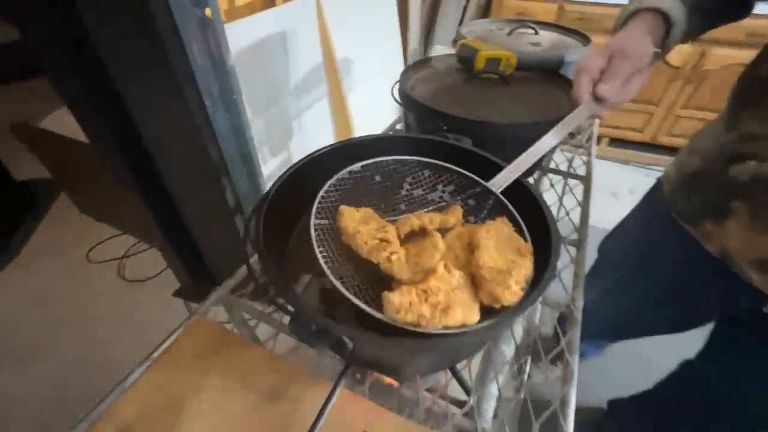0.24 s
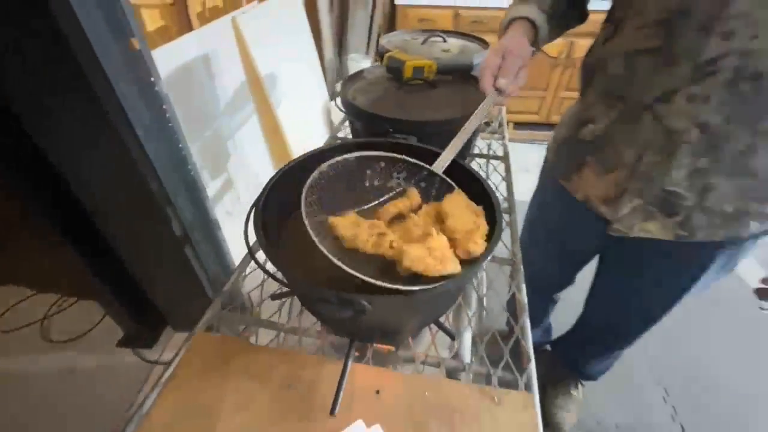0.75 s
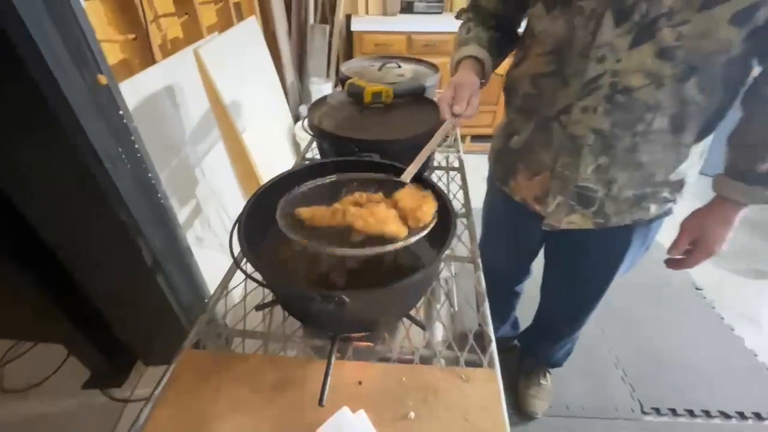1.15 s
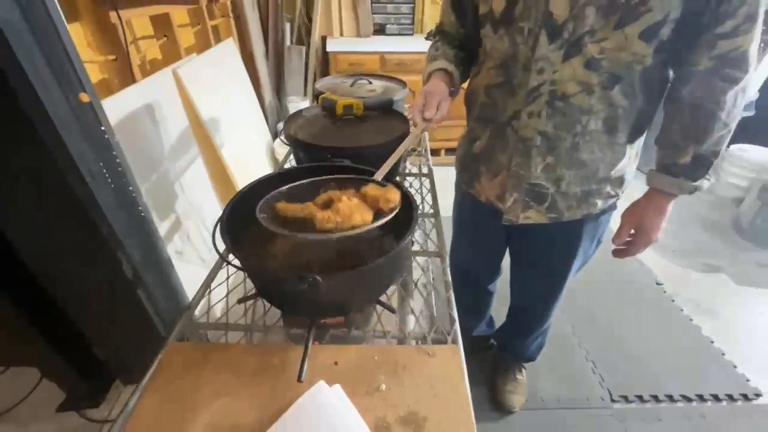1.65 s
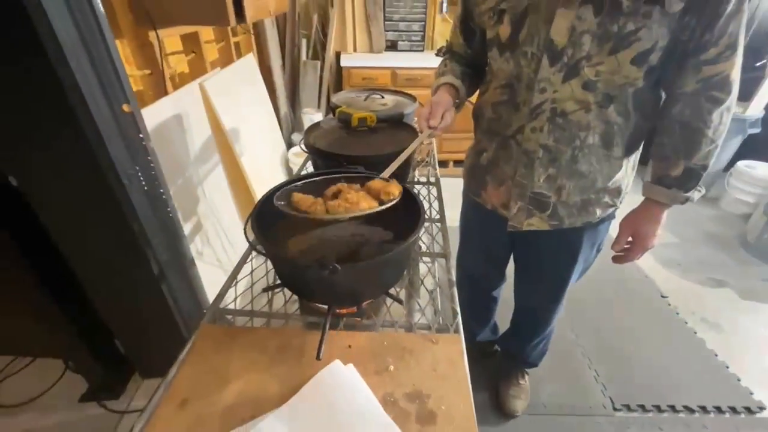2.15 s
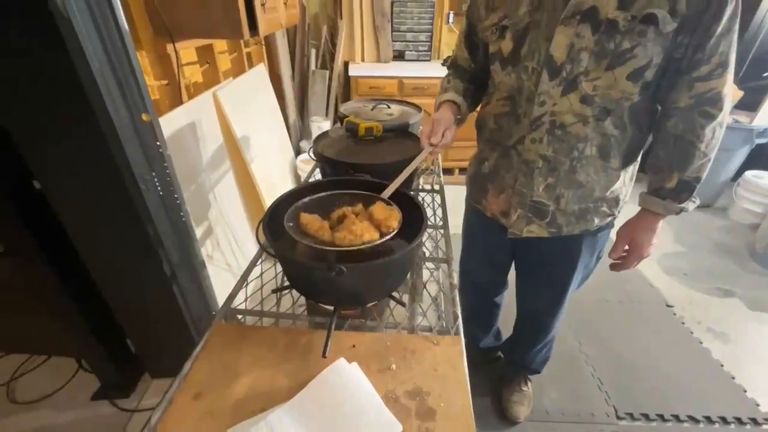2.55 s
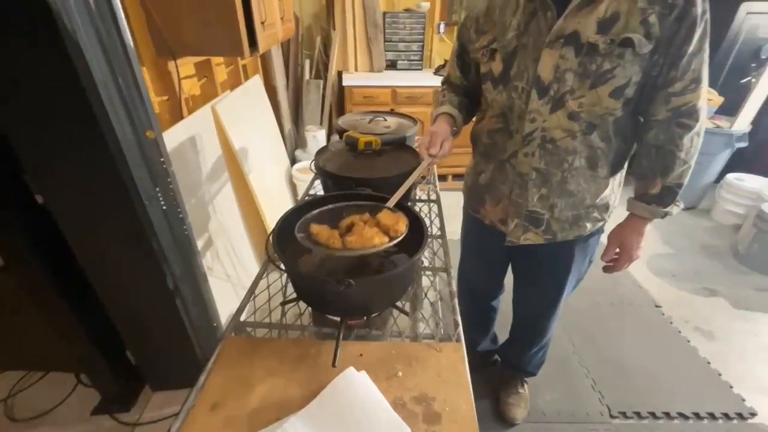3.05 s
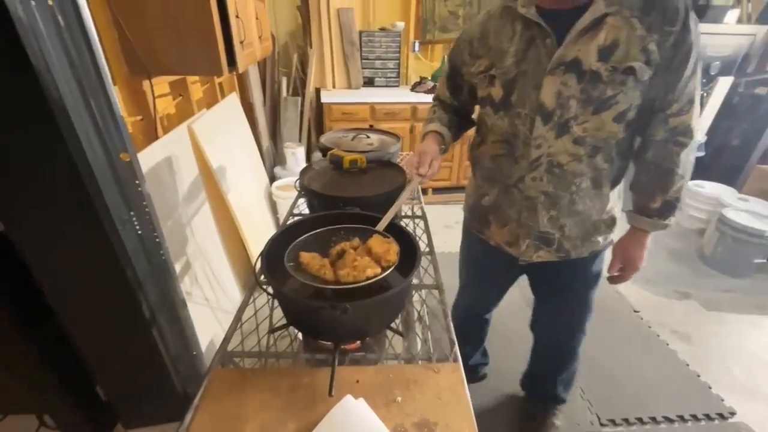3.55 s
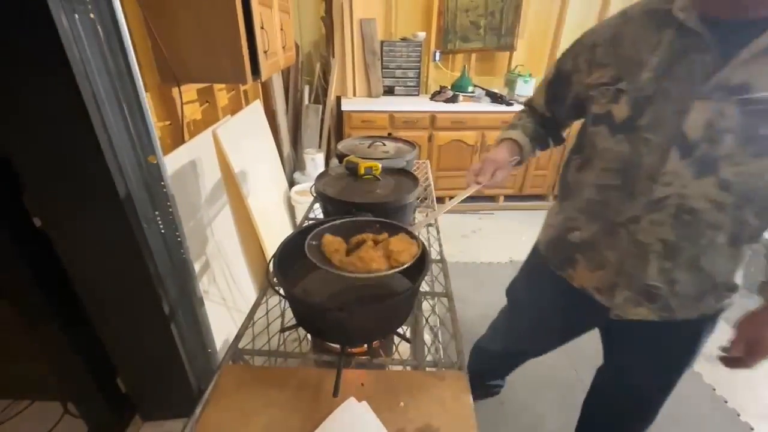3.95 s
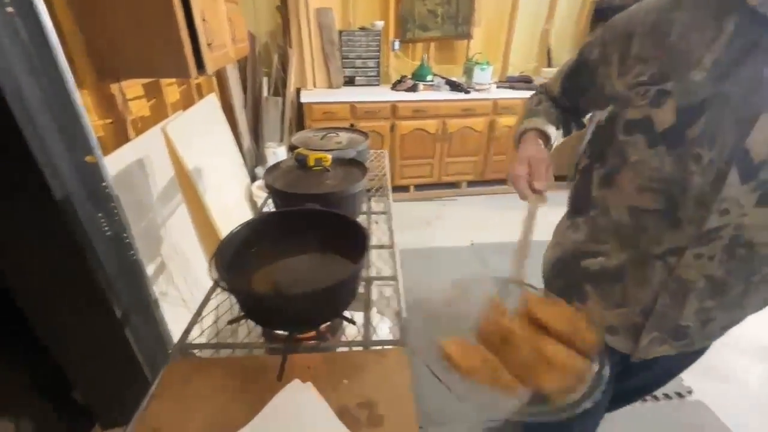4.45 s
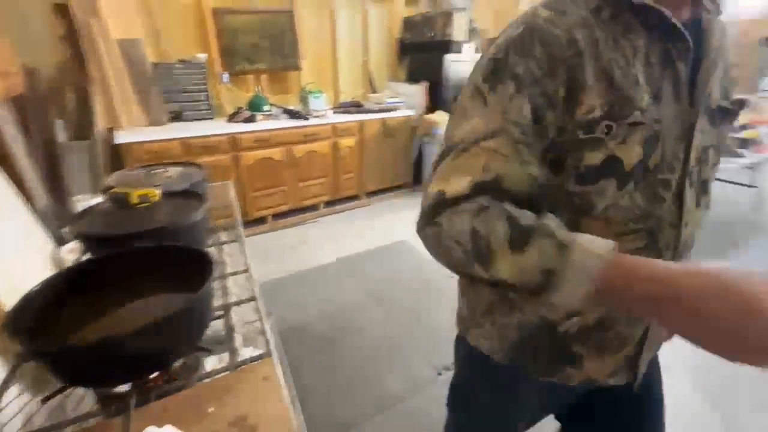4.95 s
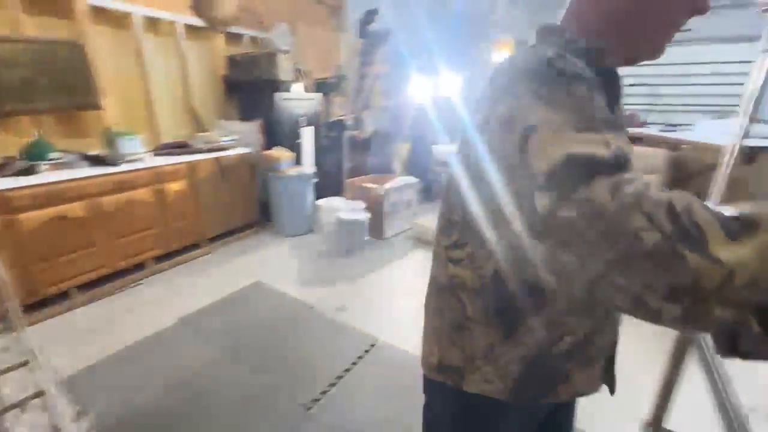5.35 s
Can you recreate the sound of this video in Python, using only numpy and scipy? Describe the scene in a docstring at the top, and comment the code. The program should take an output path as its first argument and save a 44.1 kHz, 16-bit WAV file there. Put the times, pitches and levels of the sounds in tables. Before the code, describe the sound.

Close mono sound of a wire scoop striking a heavy iron pot: bright mesh rattle, dull thud and short clear ringing, each blow cutting off the last ring. The blows start irregularly, then settle into an even rhythm, with low bumps and grate taps beneath. A last short clack ends them just after three seconds; gritty shoe scuffs on concrete follow in a quiet, slightly humming garage.

```python
"""It opens on the ringing tail of a knock; a wire strainer meets the rim of a cast iron pot in a garage, in mono.
Each contact is mesh noise, a thud and clear hoop modes, and chokes the pot's ringing to start it anew;
the pot's modes answer to the place struck. The pot rocks on a steel grate in soft random taps.
Behind it soles scuff the concrete as grains of noise, with narrow-noise ticks and low bumps of sine and noise.
Lowest lie a lumpy handling rumble and unsteady room noise; the microphone chain cuts the top."""
import sys
import numpy as np
from scipy import signal
from scipy.fft import rfft, irfft, next_fast_len
from scipy.io import wavfile
from scipy.ndimage import uniform_filter1d, map_coordinates

SR = 44100
rng = np.random.default_rng(int(sys.argv[2]) if len(sys.argv) > 2 else 0)


def wav_out(sig):
    """Save sig, one row per channel (or a flat mono array), as 16-bit PCM at SR to the path in sys.argv[1]."""
    wavfile.write(sys.argv[1], SR, np.round(np.clip(np.atleast_2d(sig).T, -1, 1) * 32767).astype(np.int16))


N = 246959


def amp(db):
    """Decibels to a linear factor."""
    return 10 ** (np.asarray(db) / 20)


def unit(x):
    """x scaled to an RMS of one."""
    return x / np.sqrt(np.mean(x ** 2) + 1e-20)


def along(points, hz):
    """Interpolate (Hz, value) points on a log frequency axis."""
    f, v = np.transpose(points)
    return np.interp(np.log(hz + 1), np.log(f + 1), v)


def level_curve(points):
    """Linear gain per sample through (s, dB) points, -120 dB outside them."""
    s, db = np.transpose(points)
    return amp(np.interp(np.arange(N) / SR, s, db, -120, -120))


def wobble(rate):
    """A smooth random curve with this many knots a second."""
    knots = rng.standard_normal(int(N * rate / SR) + 4)
    return map_coordinates(knots, [np.arange(N) * rate / SR])


def filtered(x, response):
    """x filtered by a complex response of frequency, padded against wrap-around."""
    n = x.shape[-1]
    m = next_fast_len(n + 8192)
    return irfft(rfft(x, m) * response(np.fft.rfftfreq(m, 1 / SR)), m)[..., :n]


def resonances(modes):
    """Causal response of (Hz, width Hz, dB) modes, summed with alternating sign."""
    def response(f):
        total = 0
        for k, (centre, width, db) in enumerate(modes):
            mode = 1j * f * width / (centre * centre - f * f + 1j * f * width)
            total = total + (-1) ** k * amp(db) * mode
        return total
    return response


def coloured(points):
    """Response through (Hz, dB) points."""
    return lambda hz: amp(along(points, hz))


def patchy(x, patchy_db, size):
    """Noise with patches of random gain in time and frequency."""
    z = signal.stft(x, nperseg=256)[2]
    field = uniform_filter1d(rng.standard_normal(z.shape), size=size, axis=0)
    field = uniform_filter1d(field, size=size + 2, axis=1)
    return signal.istft(z * amp(patchy_db * unit(field)), nperseg=256)[1][:len(x)]


def add(track, s, sound):
    """Mix a sound in at s seconds."""
    part = track[round(s * SR):][:len(sound)]
    part += sound[:len(part)]


def ever_faster_fade(u):
    """The ring dies ever faster: loss grows with the fourth power, 20 dB at 0.35 s."""
    return amp(-20 * (u / 0.35) ** 4)


# Contacts of strainer and rim, for pot() and strainer(): [t/s, rise/s (each layer scales it), mesh level/dB,
# fade stretch (factor), tilt/dB per octave (nominal), ring level/dB, place on rim/deg, best-ringing f/Hz]
CONTACTS = [(0.0, 0.00071, -45, 0.57, -4.6, -33, 133.5, 776),
            (0.089, 0.0015, -42.5, 0.81, -7.5, -37.5, 33, 1115),
            (0.601, 0.049, -40, 0.9, -1.8, -27, 70, 910), (0.653, 0.0068, -30, 0.91, 2.5, -33, 35.4, 1140),
            (0.669, 0.0041, -27, 0.61, 4, -24.5, 70.2, 2280),
            (0.855, 0.0029, -27, 0.27, -2.5, -38.5, 31.4, 1160),
            (0.894, 0.0016, -38, 0.41, -3.5, -42.5, 89, 1107), (1.18, 0.054, -37, 1, -2.5, -22, 37.8, 797),
            (1.432, 0.056, -35.5, 1, -2.2, -31.5, 5.4, 1000), (1.695, 0.049, -37, 1, -0.5, -35, 126, 880),
            (1.935, 0.059, -38, 0.81, -2.8, -35, 0.92, 667),
            (2.245, 0.045, -36.5, 0.98, -1.4, -25.5, 179, 4080),
            (2.536, 0.048, -37, 1, 0.7, -28, 179, 4000), (2.827, 0.053, -37.5, 0.95, 0.4, -33.5, 179, 3370),
            (3.102, 0.044, -38, 0.82, -1.1, -32, 179, 3380),
            (3.209, 0.00094, -29.5, 0.32, -1.3, -43, 106, 997)]
# Pot modes in families that a blow excites together: [f/Hz, level/dB, t60/s before any damping]
POT_MODES = [
    [(394.5, 0, .5)],
    [(716, 0, .6)],
    [(1572, 0, .45)],
    [(1615.5, 0, 1.1)],
    [(2073.3, 0, .6)],
    [(2112.4, 0, .65)],
    [(3193.5, 0, .32), (1117.3, -8, .32), (1147.2, -5, .26), (2612.5, -4, .14), (3085.3, -10, .34),
     (3567, -7, .17), (3722, -3, .07), (3877.5, -4, .21), (4211, -22, .45), (4316, -16, .25),
     (5820, -17, .12)],
]
# Bending waves round the rim, one count per family
RIM_WAVES = [2, 3, 5, 5, 6, 6, 8]
# Mode shape of each family: [antinode/deg, level/dB]
RIM_SHAPES = [(-1, -2), (8.5, -4), (47.5, -1), (52.5, 6.5), (45, 3.5), (-7.5, 0.5), (55, 7)]
# The strainer is laid on the rim and smothers the ringing: [t/s]
STRAINER_LAID = [0.18, 3.25]
NARROW_DB, NODE_SHARE = 8, 0.12  # loss one octave from the best pitch; share left at a node


def pot():
    """Each contact grips the rim: the old ringing is choked and bending modes swell anew."""
    out, t = np.zeros(N), np.arange(SR) / SR
    starts = [row[0] for row in CONTACTS] + [N / SR]
    for (s, rise, _, _, _, ring_db, place, best_hz), stop in zip(CONTACTS, starts[1:]):
        u = t[:int((min(stop - s, .5) + .05) * SR)]
        swell = 1 - np.exp(-(u / (0.57 * rise)) ** 2)
        choke = np.exp(-np.maximum(u - (stop - s), 0) / 0.025)
        grip = swell * choke * ever_faster_fade(u)
        for laid in STRAINER_LAID:
            if s < laid:
                grip *= np.exp(-np.maximum(u + s - laid, 0) / 0.055)
        for family, waves, (antinode, shape_db) in zip(POT_MODES, RIM_WAVES, RIM_SHAPES):
            octaves_off = np.log2(family[0][0] / best_hz)
            level_db = ring_db + shape_db - NARROW_DB * octaves_off ** 2
            # a blow at a node hardly moves the mode
            moves = np.abs(np.cos(waves * np.radians(place - antinode))) + NODE_SHARE
            for hz, db, t60 in family:
                # the hand's pressure on the rim varies, 40 knots a second
                waver_db = 1.9 * np.interp(u, np.arange(24) / 40, rng.standard_normal(24))
                envelope = moves * grip * amp(level_db + waver_db + db - 60 * u / t60)
                # phase runs on one clock across contacts
                tone = np.sin(2 * np.pi * hz * (u + round(s * SR) / SR))
                add(out, s, envelope * tone)
    return out


def wires(grid):
    """Responses of 600 thin wire modes at random pitches, one row each."""
    hz = 1000 + 14500 * rng.random((600, 1)) ** 1.5
    width = .003 * hz + 14
    return 1j * grid * width / (hz ** 2 - grid ** 2 + 1j * grid * width)


# Mesh resonances, relative: [f/Hz, width/Hz, level/dB]
MESH_MODES = [(1238, 200, -8.5), (2504, 115, 6), (2602, 282, 7), (2810, 250, 3.5), (3720, 380, -7.5),
              (4513, 180, -5), (5040, 830, -14), (7200, 610, -17), (8330, 390, -17.5), (11000, 1400, -19),
              (12400, 9200, -27)]
# Thud resonances, relative: [f/Hz, width/Hz, level/dB]
THUD_MODES = [(396, 225, -3), (639.6, 155, 13), (711, 320, 7.5)]
THUD_DB, THUD_AT_DB, THUD_GROWS = -40.5, -36.5, 0.68  # thud at this mesh level; dB of thud per dB of mesh


def mesh_and_thud(mesh_db, bright_db, grid, modes, length):
    """Chattering noise through wires of random strength, plus low noise through the thud modes."""
    # wire strengths are drawn at random for each blow
    strengths = rng.choice([-1, 1], len(modes)) * amp(rng.normal(0, 4.2, len(modes)))
    tilt = amp(bright_db * np.log2(grid / 2600 + 0.49))
    mesh = np.abs(resonances(MESH_MODES)(grid) * (1.6 + strengths @ modes)) * tilt
    chatter = uniform_filter1d(rng.standard_normal((2, length)), size=88, axis=1)
    noise = rng.standard_normal((2, length)) * amp(1.1 * unit(chatter))
    top_hz = 14000 * 2 ** (min(bright_db, 0) / 9.5)  # dull contacts lose more treble

    def mesh_response(f):
        return np.interp(f, grid, mesh) / (1.5 + (f / top_hz) ** 6)

    def thud_response(f):
        return resonances(THUD_MODES)(f) * f ** 4 / (f ** 4 + 200 ** 4)

    thud_db = THUD_DB + THUD_GROWS * (mesh_db - THUD_AT_DB)
    rattle = amp(mesh_db) * unit(filtered(noise[0], mesh_response))
    return rattle + amp(thud_db) * unit(filtered(noise[1], thud_response))


# Decay of mesh, thud and hoop, before each contact's stretch: [f/Hz, t60/s]
DECAY = [(200, 0.66), (700, 0.38), (2700, 0.42), (5000, 0.3), (9000, 0.24), (15000, 0.31)]
# Clear modes of the strainer's hoop and handle: [f/Hz]
HOOP_HZ = np.array([2519, 2565, 2632, 2721, 2849, 3768, 4425, 4581, 4715, 4947, 5082, 5367, 5762, 6205, 6605, 7080, 8059, 8409, 9090, 10164, 10535, 11488])
CLEAR_DB, CLEAR_WHEN_DULL = -8.5, 0.83  # hoop over mesh; dB gained per dB of dullness


def hoop_ring(rise, mesh_db, stretch, bright_db, u):
    """Decaying sines of hoop and handle; loose wires make the ring flicker."""
    share = np.abs(resonances(MESH_MODES)(HOOP_HZ)) ** 0.87
    share = share * amp(0.65 * bright_db * np.log2(HOOP_HZ / 2600 + 0.2))
    spread_db = rng.normal(0, 5.1, len(HOOP_HZ))
    level = amp(mesh_db + CLEAR_DB - CLEAR_WHEN_DULL * bright_db + spread_db)
    share = unit(share) * level / np.sqrt(len(HOOP_HZ))
    t60 = 1.12 * stretch * along(DECAY, HOOP_HZ)
    dies = amp(-60 * np.outer(1 / t60, np.maximum(u - rise / 2, 0)))
    flicker = uniform_filter1d(rng.standard_normal(dies.shape), size=600, axis=1)
    dies = dies * amp(4.5 * unit(flicker))
    phases = np.outer(HOOP_HZ, u) + rng.random((len(HOOP_HZ), 1))
    return share @ (dies * np.sin(2 * np.pi * phases))


def strainer():
    """Wires chatter against the iron; every band dies at its own speed in mesh and room."""
    out, length = np.zeros(N), SR // 2
    u = np.arange(length) / SR
    grid = np.arange(0, SR / 2, 6.)
    modes = wires(grid)
    for s, rise, mesh_db, stretch, bright_db, *_ in CONTACTS:
        stretch = max(stretch, .1)
        body = mesh_and_thud(mesh_db, bright_db, grid, modes, length)
        hoop = hoop_ring(rise, mesh_db, stretch, bright_db, u)
        hz, t, z = signal.stft(body, SR, nperseg=256)
        # the heavy low modes take longer to get going
        held = 0.63 * rise * (1 + 300 / (hz[:, None] + 300))
        late = np.maximum(t - held, 0)
        late = late / (stretch * along(DECAY, hz)[:, None])
        decay = amp(-60 * late) + 0.31 * amp(-60 * late / 0.027)  # slow tail and a quick first drop
        fading = signal.istft(z * decay, SR, nperseg=256)[1][:length]
        first_touch = 0.16 * np.minimum(u / 0.0035, 1)
        full_weight = 0.92 * np.minimum(u / (0.41 * rise), 1)
        add(out, s, (fading + hoop) * ever_faster_fade(u) * (first_touch + full_weight))
    return out


# The pot rocking on the grate: [t/s, level/dB]
ROCKING_LEVEL = [(0.9, -63), (1.23, -74.5), (1.39, -54), (1.55, -45), (1.66, -47), (2.19, -52), (2.37, -62),
                 (3.08, -65), (3.57, -75.5), (3.7, -81)]


def grate():
    """Soft low taps as the heavy pot rocks, 130 a second on average, at random."""
    taps = (rng.random(N) < 130 / SR) * amp(1.9 * rng.standard_normal(N))
    taps = taps + 0.04 * rng.standard_normal(N)
    ring = resonances([(394, 17, 8), (560, 90, -5), (720, 80, -5)])

    def response(f):
        # a soft contact has little treble
        soft = f ** 2 / (f ** 2 + 250 ** 2) / (1 + 1j * f / 900) ** 3
        return soft * ring(f)

    return level_curve(ROCKING_LEVEL) * unit(filtered(taps, response))


# Drags of a sole: [t/s, rise/s, hold/s, sole level/dB, centre f/Hz, grit level over sole/dB]
SOLE_DRAGS = [(0.311, 0.11, 0.017, -60, 2950, -0.5), (0.454, 0.02, 0.022, -43.5, 3150, -0.5),
              (2.612, 0.023, 0.15, -61, 4600, -8.5), (3.686, 0.04, 0.006, -48.5, 2550, -6.5),
              (3.948, 0.016, 0.065, -69.5, 3450, -6), (4.077, 0.034, 0.0062, -56, 2840, 2.5),
              (4.183, 0.013, 0.076, -52.5, 3170, -11), (4.231, 0.0024, 0.037, -45, 1830, -5),
              (4.291, 0.063, 0.048, -44.5, 3400, -19.5), (4.429, 0.018, 0.067, -45.5, 2280, -10.5),
              (5.086, 0.019, 0.028, -45, 2710, -3.5), (5.188, 0.0031, 0.021, -53.5, 2380, -22.5),
              (5.329, 0.065, 0.074, -65, 2650, -13.5)]
# Colour of the sole, relative: [f/Hz, level/dB per Hz]
SOLE_COLOUR = [(700, -60.5), (1150, -4), (1500, 7), (5500, 2.5), (7000, -9.5)]
# Colour of the grit, relative: [f/Hz, level/dB per Hz]
GRIT_COLOUR = [(2940, -18), (5000, 6), (6700, 3.5), (12700, -3.5), (15700, -8)]


def shoes():
    """Soles drag grit over concrete: dense short grains that swell, hold and die away."""
    out, u = np.zeros(N), np.arange(SR // 2) / SR
    for s, rise, hold, db, hz, treble_db in SOLE_DRAGS:
        noise = rng.standard_normal((2, len(u)))
        grains = noise * amp([2 * wobble(900)[:len(u)] + wobble(33)[:len(u)] for _ in range(2)])
        body = resonances([(hz, .6 * hz, 0)])
        sole = filtered(patchy(grains[0], patchy_db=1.5, size=3),
                        lambda f: body(f) ** 2 * amp(along(SOLE_COLOUR, f)))
        grit = filtered(patchy(grains[1], patchy_db=3.5, size=4), coloured(GRIT_COLOUR))
        late = np.maximum(u - rise - hold, 0)
        drag = unit(sole) * amp(-60 * late / 0.21) + unit(grit) * amp(treble_db - 60 * late / 0.14)
        add(out, s, amp(db) * np.minimum(u / rise, 1) * drag)
    return out


def puff(length, hz, width):
    """A band of noise round one resonance, at unit RMS."""
    band = resonances([(hz, width, 0)])
    return unit(filtered(rng.standard_normal(length), lambda f: band(f) ** 2))


# Thin ticks: [t/s, level/dB before the envelope, f/Hz]
TICK_EVENTS = [(1.654, -52.5, 5200), (2.07, -61.5, 7550), (3.415, -69, 6270), (4.788, -61.5, 2510),
               (5.067, -61, 4750)]


def ticks():
    """Narrow noise that starts at once and dies 60 dB in 0.088 s."""
    out, t = np.zeros(N), np.arange(SR // 4) / SR
    for s, db, hz in TICK_EVENTS:
        onset = 1 - np.exp(-t / 0.00092)
        add(out, s, amp(db - 60 * t / 0.088) * puff(len(t), hz, .2 * hz) * onset)
    return out


# Low bumps: [t/s, level/dB before the envelope, f/Hz, t60/s]
BUMP_EVENTS = [(0.688, -46, 161, 0.23), (1.609, -38, 454, 0.041), (2.049, -37, 358, 0.1),
               (2.084, -36, 390, 0.041), (2.163, -46.5, 423, 0.097), (2.231, -55, 597, 0.052),
               (2.885, -35, 128, 0.048), (2.931, -39, 407, 0.055), (3.129, -37.5, 118, 0.039),
               (3.296, -49, 411, 0.18), (3.448, -52.5, 360, 0.12), (5.508, -51, 122.8, 0.12)]


def bumps():
    """A decaying low sine as the push, with broad noise centred above its pitch."""
    out, t = np.zeros(N), np.arange(SR // 4) / SR
    for s, db, hz, t60 in BUMP_EVENTS:
        push = np.sin(2 * np.pi * hz * t)
        onset = 1 - np.exp(-t / 0.0017)
        noise = puff(len(t), 1.6 * hz, 1.5 * hz)
        add(out, s, amp(db - 60 * t / t60) * (push + 0.8 * noise) * onset)
    return out


# Handling rumble: [t/s, level/dB]
HANDLING_LEVEL = [(0.0, -93.5), (2.51, -89.5), (3.04, -72.5), (3.6, -96), (4.8, -83.5), (4.99, -97),
                  (5.6, -79)]


def handling():
    """A lumpy rumble: noise of random swells, kept mostly between 12 and 45 Hz."""
    lumps = rng.standard_normal(N) * amp(3.0 * wobble(29) + 2.1 * wobble(6))
    rumble = filtered(lumps, lambda f: f ** 2 / (f ** 2 + 12 ** 2) / (1 + (f / 45) ** 5))
    return level_curve(HANDLING_LEVEL) * unit(rumble)


# Colour of the room noise, relative: [f/Hz, level/dB per Hz]
ROOM_COLOUR = [(41, -47.5), (70, -35.5), (190, -19.5), (238, -7), (374, -20), (439, -10), (563, -6),
               (630, -14.5), (755, -9), (1870, -27.5), (7280, -39), (15700, -50)]
# Room noise, before a small random waver: [t/s, level/dB]
ROOM_CURVE = [(0, -69), (3.3, -68), (3.65, -73.5), (4.2, -66), (4.9, -72.5), (5.6, -67.5)]


def garage():
    """Unsteady room noise: coloured, patchy noise whose level wavers."""
    air = patchy(rng.standard_normal(N), patchy_db=2.5, size=8)
    level = level_curve(ROOM_CURVE) * amp(0.88 * wobble(3.7))
    return level * unit(filtered(air, coloured(ROOM_COLOUR)))


def scene():
    """All layers at one mono microphone, from the pot back to the room."""
    near = pot() + strainer() + grate()
    around = shoes() + ticks() + bumps()
    return (near + around + handling() + garage())[None]


def record(dry):
    """The microphone chain keeps nothing above 15850 Hz."""
    return filtered(dry, lambda hz: hz < 15850)


dry = scene()
out = record(dry)
wav_out(out)
```